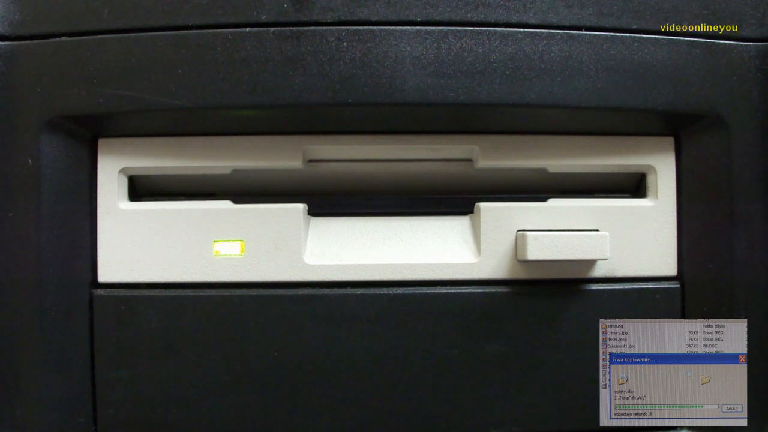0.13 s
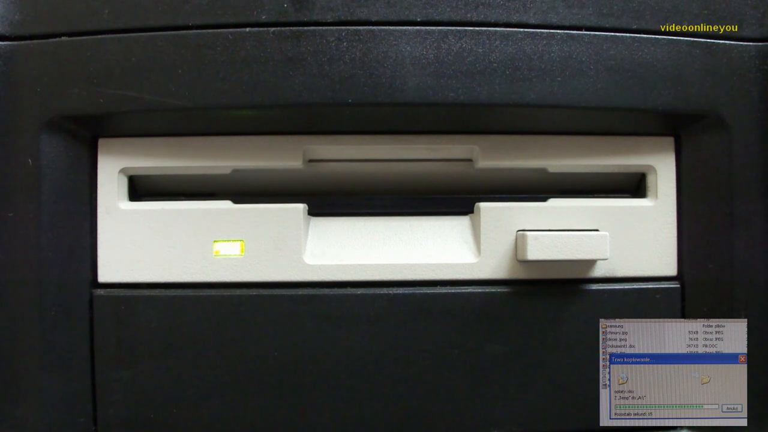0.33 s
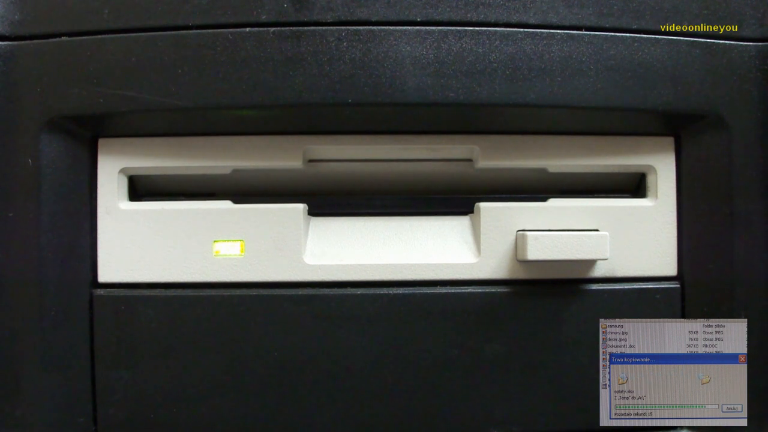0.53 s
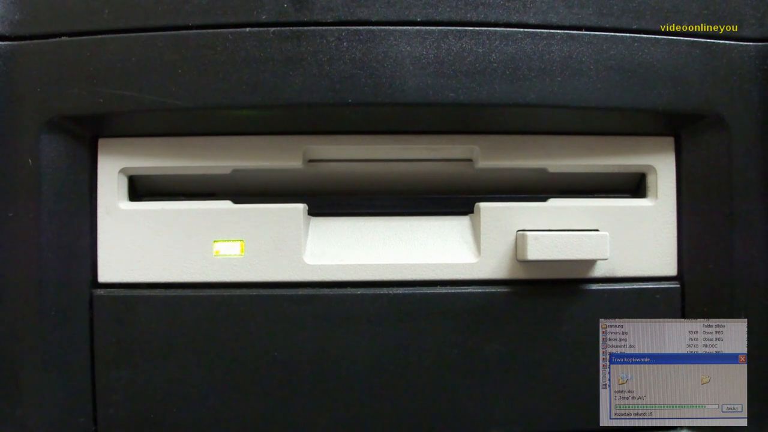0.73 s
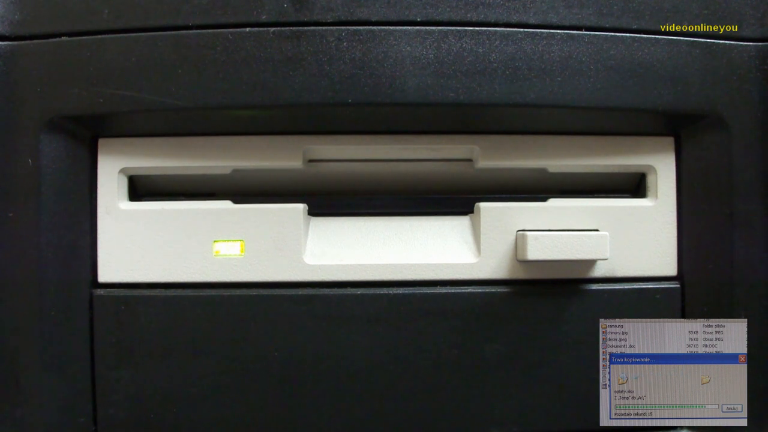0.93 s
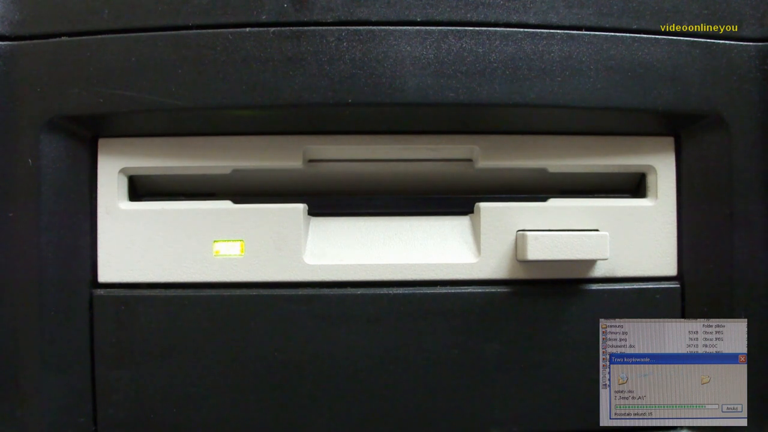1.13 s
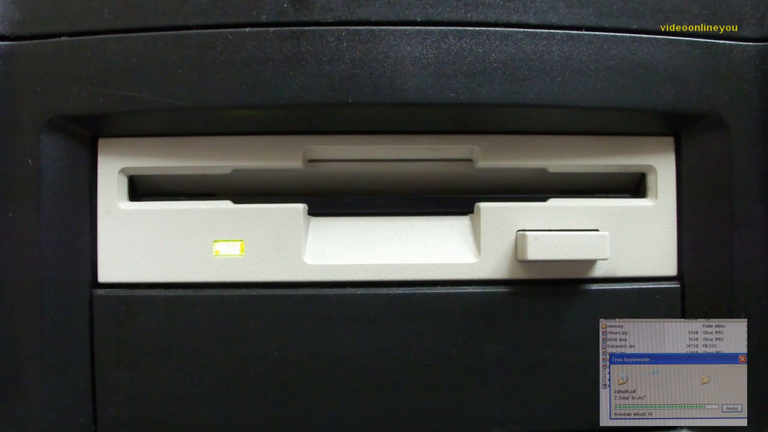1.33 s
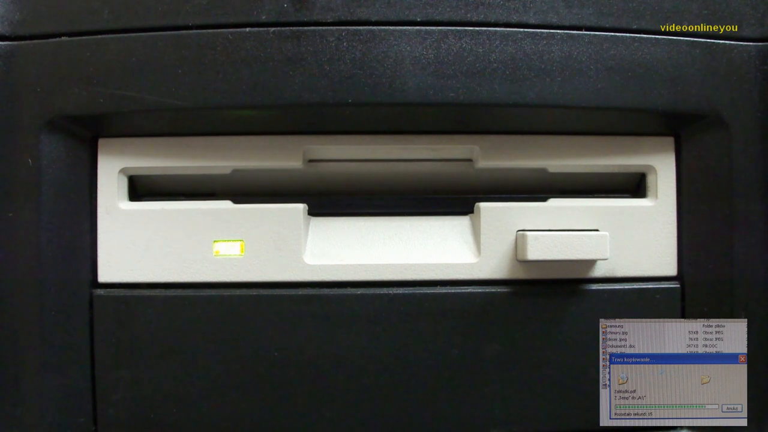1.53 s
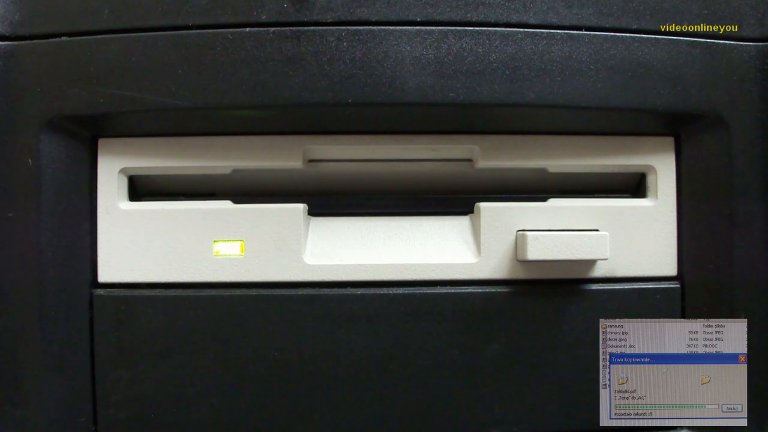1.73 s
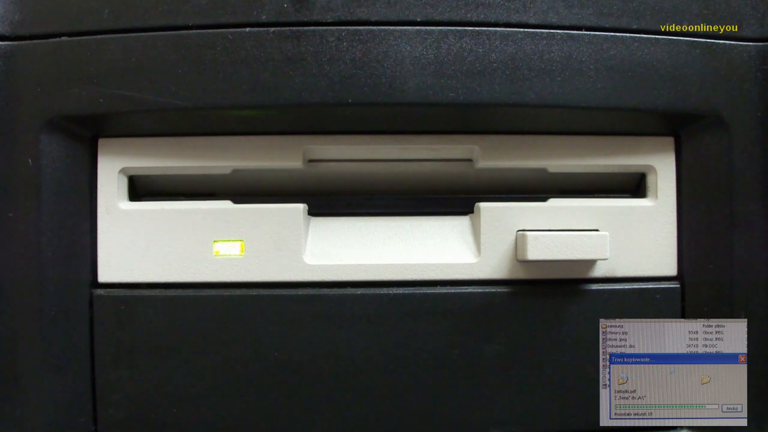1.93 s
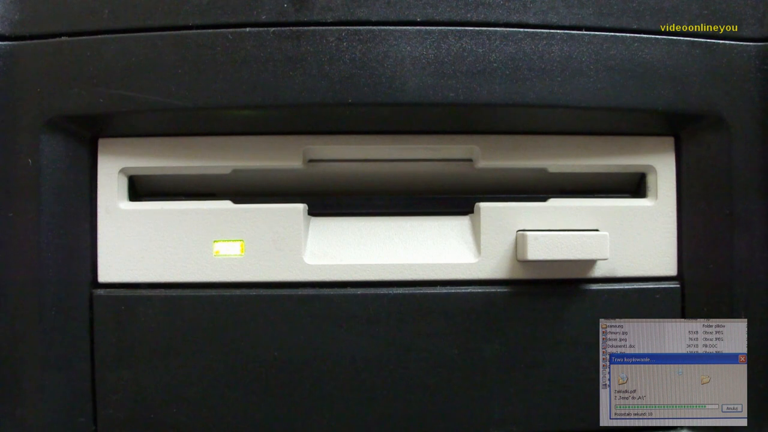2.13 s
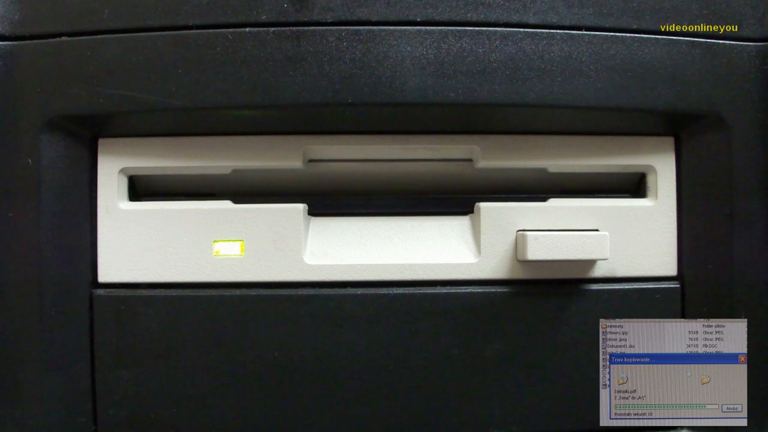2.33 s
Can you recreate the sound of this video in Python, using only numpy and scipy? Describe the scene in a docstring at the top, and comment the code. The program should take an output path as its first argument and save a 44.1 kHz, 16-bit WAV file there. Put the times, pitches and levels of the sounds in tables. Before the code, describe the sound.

Floppy disk drive head seeks out and back, buzzing harshly twice above constant fan noise.

```python
"""In a room, a floppy drive close to the microphone, to the right, runs its head across the disk and back.
The stepper's buzz is a stack of tones on a fixed step rate; noise pulsed at each step is the lead screw's scrape.
The carriage clatters at each start and stop: bursts of coloured noise and ringing modes, with a room tail.
The disk brushes its liner faintly; a case fan, mains hum and a thin hiss go on throughout."""
import sys
import numpy as np
from scipy import signal
from scipy.fft import rfft, irfft
from scipy.io import wavfile

SR = 44100
rng = np.random.default_rng(int(sys.argv[2]) if len(sys.argv) > 2 else 0)


def pcm_store(signal):
    """Save signal as 16-bit PCM."""
    levels = np.round(np.clip(np.atleast_2d(signal), -1, 1) * 32767)
    wavfile.write(sys.argv[1], SR, levels.astype(np.int16).T)


N = 105840
T, FREQS = np.arange(N) / SR, np.fft.rfftfreq(N, 1 / SR)
DRIVE_PAN_DB = -7.5  # left minus right

# spectrum of sharp ticks and of the disk's swish: (frequency [Hz], relative density [dB per Hz])
TICK_SPECTRUM = [(100, -59), (300, -44), (2500, -8), (3300, -16.5), (4800, 1), (6300, 14), (7500, 3.5),
                 (10400, 5), (11400, -24), (12200, -64)]


def amp(db):
    """Decibels to gain."""
    return 10 ** (np.asarray(db) / 20)


def evened(x):
    """Scales to rms 1; for a pair, the rms of its middle."""
    middle = np.atleast_2d(x).mean(0)
    return x / np.sqrt(np.mean(abs(middle) ** 2) + 1e-20)


def read(points, hz):
    """Reads a table on a log-frequency axis."""
    f, value = np.transpose(points)
    return np.interp(np.log(hz + 1), np.log(f + 1), value)


def pan(db):
    """Left and right gains, db apart, whose mean is 1."""
    gains = amp([[db / 2], [-db / 2]])
    return gains / gains.mean()


def noise(gain, gate=1):
    """Noise for two channels, partly alike, gated in time and then coloured by a gain over frequency."""
    # left-right likeness: (frequency [Hz], coherence [0-1])
    likeness = [(60, 0.26), (110, 0.93), (220, 0.2), (330, 0.082), (500, 0.48), (740, 0.62), (1200, 0.51),
                (2600, 0.66), (4000, 0.22), (12000, 0.089)]
    a, b = rfft(rng.standard_normal((2, N)) * gate)
    same = np.clip(read(likeness, FREQS), -1, 1)
    left = same * a + np.sqrt(1 - same ** 2) * b
    return evened(irfft(np.array([left, a]) * gain, N))


def drift(rate_hz):
    """Slow random motion of rms 1: noise kept mostly below rate_hz."""
    spectrum = rfft(rng.standard_normal(N))
    return evened(irfft(spectrum / (1 + (FREQS / rate_hz) ** 4), N))


def resonance(hz, width_hz):
    """Gain of one resonance with steep skirts."""
    return 1 / (1 + 1j * (FREQS - hz) / width_hz) ** 2


def tone(hz, waver, rate_hz):
    """A line of rms 1 that wavers in level and phase."""
    wobble = 1 + waver * (drift(rate_hz) + 1j * drift(rate_hz))
    carrier = np.exp(2j * np.pi * (hz * T + rng.random()))
    return evened((wobble * carrier).real)


def ring(modes, t):
    """Modes dying away after a blow, each falling 60 dB in its t60."""
    total = 0
    for hz, db, t60 in modes:
        total = total + amp(db - 60 * t / t60) * np.sin(2 * np.pi * (hz * t + rng.random()))
    return total


def room(x):
    """A short diffuse tail of decaying noise, different in each channel."""
    t60_s, gap_s = 0.41, 0.004
    t = T[:SR // 2]
    tail = rng.standard_normal((2, len(t))) * amp(-60 * t / t60_s) * (t > gap_s)
    return signal.fftconvolve(x, tail / np.linalg.norm(tail[0]), axes=1)[:, :N]


def hiss():
    """Thin steady hiss: coloured noise."""
    # (frequency [Hz], relative density [dB per Hz])
    hiss_spectrum = [(100, -17), (3200, -14), (4800, -7.5), (5500, -1), (7500, 1.5), (9000, -1.5),
                     (10100, -4.5), (10550, 4.5), (10850, -8), (11300, -11), (11800, -47), (14200, -42),
                     (15200, -28), (15650, -11)]
    level_db, pan_db = -67.5, -3
    return amp(level_db) * noise(amp(read(hiss_spectrum, FREQS))) * pan(pan_db)


def fan():
    """Air rushing through the case is coloured noise; mains hum and faint blade tones are wavering lines."""
    # rush of air: (frequency [Hz], relative density [dB per Hz])
    air_spectrum = [(20, -40), (45, -34), (90, -22), (140, -16), (200, -4), (290, -2.5), (370, -2),
                    (440, -2.5), (520, 2), (610, 5), (690, 0.5), (790, 1.5), (950, -3), (1200, 0.5),
                    (1500, -5), (1680, -2.5), (2000, -6.5), (2450, -12.5), (2800, -22.5), (3000, -25),
                    (5000, -59.5), (16000, -64)]
    # steady tones of mains and fan: (frequency [Hz], level [dB], waver [share of the tone])
    steady_tones = [(120.7, -71, 0.045), (362.3, -69.5, 0.53), (614.4, -64, 0.45), (792, -67.5, 0.72),
                    (1233, -71, 0.46), (1338, -68, 0.84), (1660, -66.5, 1.1), (2765, -82, 1.4),
                    (7900, -90, 0.55)]
    air_db, pan_db = -49.5, -5.5
    air = noise(amp(read(air_spectrum, FREQS)))
    tones = sum(amp(db) * tone(hz, waver, rate_hz=10) for hz, db, waver in steady_tones)
    return (amp(air_db) * air + tones) * pan(pan_db)


def disk():
    """The turning disk brushes its liner: noise swelling and fading in faint brief swishes."""
    # (time of the peak [s], level [dB], length [s])
    brushes = [(1.026, -68, .008), (1.085, -65, 0.0063), (1.166, -66.5, 0.0093)]
    level = sum(amp(db) * np.exp(-.5 * ((T - s) / length) ** 2) for s, db, length in brushes)
    return level * noise(amp(read(TICK_SPECTRUM, FREQS))) * pan(DRIVE_PAN_DB)


def carriage():
    """Each knock rings frame and rail modes and sets off decaying noise of chassis, cover and tick."""
    # knocks as the carriage starts and stops: (time [s], chassis level [dB], tick level [dB],
    # cover level [dB], clatter decay [s], frame ring level [dB], rail ring level [dB])
    knocks = [(0.226, -39.5, -58.5, -56, 0.015, -47, -48), (0.236, -45, -75, -56.5, 0.012, -35, -51),
              (.644, -39.5, -57.5, -47.5, 0.0079, -37, -50), (0.650, -42, -77, -53.5, 0.021, -42, -40.5),
              (0.896, -45.5, -60, -55, 0.007, -50, -55), (.902, -39.5, -70, -65, 0.022, -37, -36),
              (1.315, -38, -55, -52, 0.012, -37.5, -50), (1.325, -45.5, -77, -53.5, 0.028, -44, -52)]
    # modes of the frame and of the guide rail: (frequency [Hz], relative level [dB], t60 [s])
    frame_modes = [(816, 0.5, .12), (960, -7, 0.1), (1712, -10.5, .08)]
    rail_modes = [(1464, 0, .1), (2125, -15.5, 0.063)]
    # resonances of the chassis: (frequency [Hz], width [Hz], relative level [dB])
    chassis_modes = [(335, 90, -0.5), (542, 80, 4.5), (694, 92, 7.5), (810, 82, 1.5), (1162, 120, 3.5),
                     (1340, 120, 2.5), (1732, 167, 3), (2090, 63, -2)]
    chassis_low_hz, rise_s, pan_db = 180, 0.00095, -5.5

    chassis_gain = sum(amp(db) * resonance(hz, width) for hz, width, db in chassis_modes)
    low_cut = (FREQS / np.hypot(FREQS, chassis_low_hz)) ** 4
    chassis = noise(chassis_gain * low_cut)
    tick = noise(amp(read(TICK_SPECTRUM, FREQS)))
    cover = noise(resonance(hz=2310, width_hz=113))  # a bright ring of the metal cover

    out = np.zeros((2, N))
    for s, chassis_db, tick_db, cover_db, decay, frame_db, rail_db in knocks:
        t = np.maximum(T - s, 0)
        clatter = amp(chassis_db) * chassis + amp(tick_db) * tick + amp(cover_db) * cover
        ringing = amp(frame_db) * ring(frame_modes, t) + amp(rail_db) * ring(rail_modes, t)
        attack = 1 - np.exp(-t / rise_s)
        out += attack * (np.exp(-t / decay) * clatter + ringing)
    return out * pan(pan_db)


def seek(way, start, end, first, last, scrape_db, rattle_db):
    """Stepper buzz plus a scrape at each step; head position shifts the buzz's balance and sets the rattle."""
    # partials of the buzz: (multiple of the step rate, level going out [dB], level coming back [dB],
    # far minus near going out [dB], far minus near coming back [dB], rise [s])
    buzz_partials = [(1, -65, -61, 2.5, 1, 0.016), (2, -75.5, -88, -14, -15, 0.0068),
                     (3, -47.5, -52.5, 1.5, -0.5, 0.05), (4, -34.5, -39.5, 1.7, 2.5, 0.008),
                     (5, -63, -50.5, 5, -4.5, 0.0087), (6, -66, -69.5, 4.5, 12, .01),
                     (7, -56, -54, 6, 3.5, 0.024), (8, -56, -57, -1, 3.5, 0.0093),
                     (9, -61.5, -56.5, 1.5, -3, 0.016), (10, -61, -55, 16.5, 0.5, 0.011),
                     (11, -56.5, -59, 14.5, 9, 0.016), (12, -60, -63.5, 15.5, -1, .01),
                     (13, -69, -65.5, 7, 5.5, .01), (14, -77, -73, 6.5, 2, 0.011),
                     (15, -75.5, -69, 4.5, -6, .01)]
    # lead screw scrape: (frequency [Hz], relative density [dB per Hz])
    scrape_spectrum = [(60, -42), (110, -16.5), (200, -7), (450, -8), (800, -1.5), (1100, -4), (1700, -3),
                       (2400, -11), (2800, -33), (3200, -30), (4800, -36.5), (6400, -22), (10000, -33),
                       (11400, -42.5), (12200, -73)]
    step_hz = 162.8
    step_decay, step_base = 0.73, 0.84  # burst decay as a share of the step; level between bursts
    far_from, far_blend = 0.4, 0.17  # head position where the balance shifts, and how gradually
    rattle_at, rattle_spread = 0.64, 0.19  # the carriage rattles around one head position
    stop_s, case_ring_s, case_share = 0.01, 0.061, 0.37  # part of the buzz lingers in the case
    scrape_rise_s = 0.006

    position = np.interp(T, [start, end], [first, last])
    far = .5 + .5 * np.tanh((position - far_from) / far_blend)
    since, after = np.maximum(T - start, 0), np.maximum(T - end, 0)
    stop = np.exp(-after / stop_s)
    release = (1 - case_share) * stop + case_share * np.exp(-after / case_ring_s)

    buzz = np.zeros(N)
    for multiple, out_db, back_db, out_far_db, back_far_db, rise in buzz_partials:
        level_db, far_db = (back_db, back_far_db) if way else (out_db, out_far_db)
        waver = 0.035 if multiple <= 5 else 0.21  # upper partials are less steady
        level = amp(level_db + far_db * (far - .5)) * (1 - np.exp(-(since / rise) ** 2))
        buzz += level * tone(multiple * step_hz, waver, rate_hz=22)

    step_phase = (T - start) * step_hz % 1
    steps = step_base + np.exp(-step_phase / step_decay)
    scrape = amp(scrape_db) * noise(amp(read(scrape_spectrum, FREQS)), steps)
    loose = np.exp(-.5 * ((position - rattle_at) / rattle_spread) ** 2)
    rattle = amp(rattle_db) * loose * tone(hz=1854, waver=0.8, rate_hz=28)
    attack = 1 - np.exp(-since / scrape_rise_s)
    return (release * buzz + attack * stop * (scrape + rattle)) * pan(DRIVE_PAN_DB)


def scene():
    """The drive in front of the fan and the hiss; the knocks also reach the room."""
    # the seek out, then the seek back: (start [s], end [s], head position at start [0-1],
    # at end [0-1], scrape level [dB], rattle level [dB])
    seeks = [(.241, .645, 0, 0.9, -52.5, -50.5), (.898, 1.314, 1, 0.12, -53, -58)]
    room_db = -10.5
    background = hiss() + fan()
    knocks = carriage()
    echoes = amp(room_db) * room(knocks)
    travel = sum(seek(way, *row) for way, row in enumerate(seeks))
    return background + disk() + knocks + echoes + travel


def record(dry):
    """Narrow notches in the treble, then a low-pass that ends the top."""
    # notch centres: (frequency [Hz])
    notch_centres = [3020, 4000, 5000]
    notch_width_hz, edge_hz = 165, 15830
    dips = [1 - np.exp(-((FREQS - hz) / notch_width_hz) ** 2) for hz in notch_centres]
    notched = irfft(rfft(dry) * np.prod(dips, axis=0), N)
    low_pass = signal.firwin(511, edge_hz, window=("kaiser", 9), fs=SR)
    return signal.oaconvolve(notched, low_pass[None], "same")


dry = scene()
out = record(dry)
pcm_store(out)
```